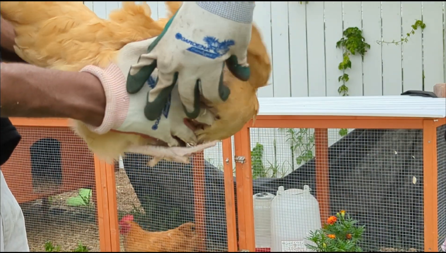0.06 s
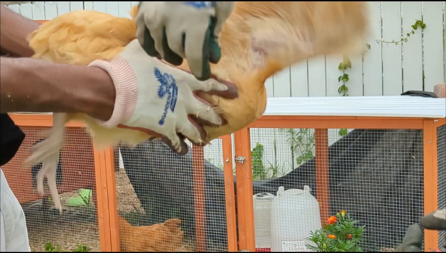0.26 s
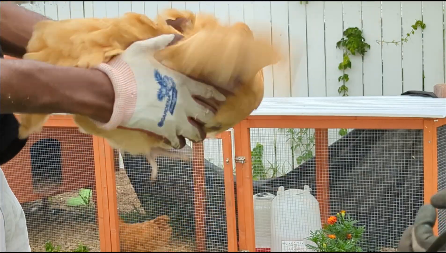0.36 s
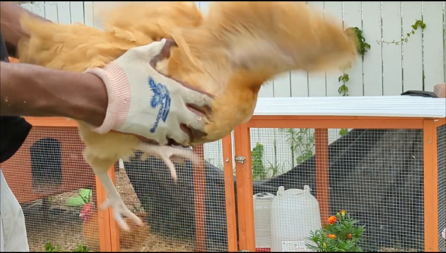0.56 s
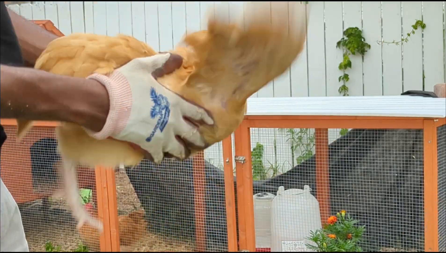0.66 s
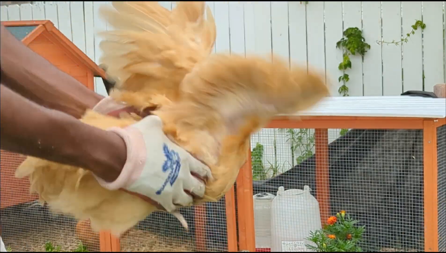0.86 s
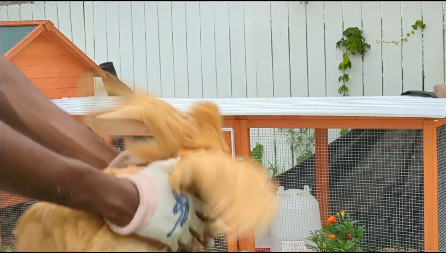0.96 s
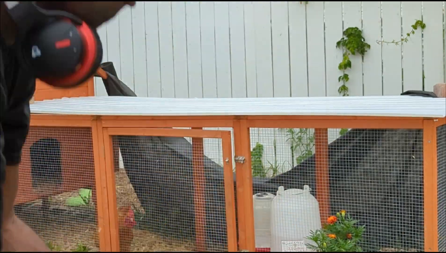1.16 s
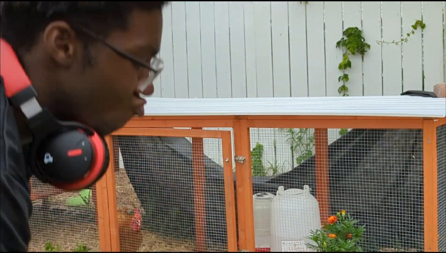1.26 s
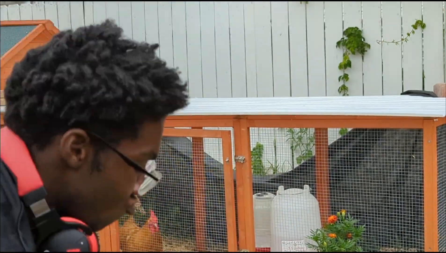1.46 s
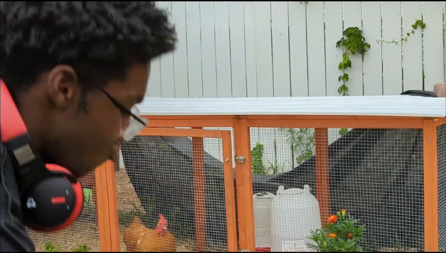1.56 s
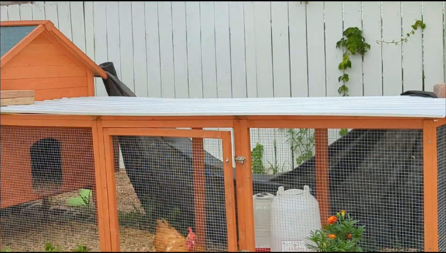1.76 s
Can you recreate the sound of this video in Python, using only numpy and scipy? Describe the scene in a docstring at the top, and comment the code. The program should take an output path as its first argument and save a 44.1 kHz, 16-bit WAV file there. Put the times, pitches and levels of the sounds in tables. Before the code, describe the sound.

Hen clucking in short hoarse bursts with flapping wings, ending in a clear squawk.

```python
"""Short, hoarse, cluck-like rasps, close to the microphone: a hen struggles in gloved hands in a backyard.
The rasps keep time with her wingbeats, which push puffs of air and snap the feathers;
then she lets out one long, clear squawk, crossed by a wing swish. Farther off, fence and coop
return a faint echo over a quiet hiss."""
import sys
import numpy as np
from scipy import signal
from scipy.fft import rfft, irfft
from scipy.io import wavfile
from scipy.ndimage import uniform_filter1d

SR = 44100
rng = np.random.default_rng(int(sys.argv[2]) if len(sys.argv) > 2 else 0)


def transcribe(u):
    """Save the signal u as a 16-bit wav file named by the first command-line argument.

    u: samples, shape (n,) or (channels, n), limited to [-1, 1]; the rate is SR.
    q: integer samples, one column per channel.
    """
    v = np.clip(np.atleast_2d(u).T, -1, 1)
    q = np.round(v * 32767).astype(np.int16)
    wavfile.write(sys.argv[1], SR, q)


N = 79380
T = np.arange(N) / SR


def amp(db):
    """Decibels to gain."""
    return 10 ** (np.asarray(db) / 20)


def unit(x):
    """Scales to rms 1."""
    return x / np.sqrt(np.mean(x ** 2) + 1e-20)


def steady(x, size=500):
    """Holds the short-time level at 1, keeping the fine grain."""
    return x / np.sqrt(abs(uniform_filter1d(x ** 2, size)) + 1e-12)


def bump(at, half):
    """A bell-shaped swell in time."""
    return np.exp(-((T - at) / half) ** 2 / 2)


def drift(hz):
    """Random wander of rms 1, up to the given rate."""
    return unit(irfft(rfft(rng.standard_normal(N)) / (1 + (np.fft.rfftfreq(N, 1 / SR) / hz) ** 4), N))


def level_at(spectrum, hz):
    """Reads a spectrum in dB on a log-frequency axis."""
    f, db = np.transpose(spectrum)
    return np.interp(np.log(hz + 1), np.log(f + 1), db)


def colour(x, spectrum):
    """Minimum-phase filter with the given spectrum and unit power gain."""
    size = 2048
    cepstrum = irfft(np.log(amp(level_at(spectrum, np.fft.rfftfreq(size, 1 / SR)))))
    cepstrum[1:size // 2] *= 2
    cepstrum[size // 2 + 1:] = 0
    taps = irfft(np.exp(rfft(cepstrum)))
    return signal.oaconvolve(x, taps / np.linalg.norm(taps))[:len(x)]


def lowpass(x, hz):
    """Removes the treble without shifting phase."""
    return signal.sosfiltfilt(signal.butter(2, hz, fs=SR, output="sos"), x)


def resonate(x, hz, width_hz):
    """A steep resonance that follows the curve hz."""
    turn = np.exp(2j * np.pi * np.cumsum(hz) / SR)
    r = np.exp(-np.pi * width_hz / SR)
    return 2 * (turn * signal.lfilter([(1 - r) ** 2], [1, -2 * r, r * r], x / turn)).real


# Background noise at the microphone (frequency [Hz], relative level [dB])
BACKGROUND_SPECTRUM = [(20, -20), (80, 3), (160, -4), (300, -7), (480, -3), (800, -9), (1900, -16),
                       (4500, -26), (7500, -25), (16000, -27)]
# Its course in two bands (time [s], body gain [dB], treble gain [dB])
BACKGROUND_GAINS = [(0, -50, -53), (.3, -50, -51.5), (.8, -51.5, -53), (1.15, -48, -49),
                    (1.602, -50, -43.5), (1.702, -51.5, -50), (1.8, -51, -37)]


def background():
    """Quiet rumble and hiss; the hiss swells as the recorder's gain recovers after the squawk."""
    times, body_db, treble_db = np.transpose(BACKGROUND_GAINS)
    noise = colour(rng.standard_normal(N), BACKGROUND_SPECTRUM)
    body = lowpass(noise, hz=2810)
    body_gain = amp(np.interp(T, times, body_db) + 1.33 * drift(86))
    treble_gain = amp(np.interp(T, times, treble_db) + 3.1 * drift(29))
    return body * body_gain + (noise - body) * treble_gain


def yard_echo(x):
    """Early reflections from the nearby coop, then a faint dull tail from the fences farther off."""
    coop_s, coop_db, fence_db, t60_s, top_hz = 0.0072, -9.5, -21.5, 0.38, 4200
    t = T[:SR // 2]
    taps = rng.standard_normal(len(t)) * (rng.random(len(t)) < 2000 / SR)  # about 2000 echoes a second
    coop = taps * (t < coop_s) * (t > coop_s / 10)
    fence = signal.lfilter(*signal.butter(1, top_hz, fs=SR), taps) * amp(-60 * t / t60_s) * (t > coop_s)
    response = amp(fence_db) * fence / np.linalg.norm(fence) + amp(coop_db) * coop / np.linalg.norm(coop)
    return signal.fftconvolve(x, response)[:N]


# Wing strokes close to the microphone (time [s], half length [s], level [dB])
WING_PUFFS = [(0.502, 0.019, -38), (0.582, 0.014, -39.5), (0.735, 0.015, -36), (0.885, 0.03, -38),
              (0.952, .02, -47), (1.105, 0.017, -36.5), (1.189, 0.014, -38), (1.255, 0.024, -39),
              (1.361, 0.032, -42), (1.463, 0.023, -38.5), (1.518, 0.0076, -35.5)]
# The air they push (frequency [Hz], relative level [dB])
PUFF_SPECTRUM = [(28, -42), (55, -3), (90, 2), (170, 1), (300, -7), (3000, -39.5)]


def wings():
    """Each stroke pushes a soft low puff of air."""
    swell = sum(amp(db) * bump(at, half) for at, half, db in WING_PUFFS)
    return swell * steady(colour(rng.standard_normal(N), PUFF_SPECTRUM), size=1000)


# Snaps and brushes at close range (time [s], rise [s], decay [s], level [dB], tilt [dB/octave])
FEATHER_SNAPS = [(0.2642, 0.00049, .002, -25.5, -1), (0.386, 0.0098, 0.02, -37.5, -1.5),
                 (0.53, 0.0026, 0.0036, -39, 5), (0.63, 0.002, 0.0014, -37, -3),
                 (0.677, 0.0035, 0.0042, -34.5, -1), (0.69, 0.0022, 0.0038, -39, -1),
                 (0.864, 0.0015, 0.0062, -40.5, 3), (0.980, 0.0047, 0.0092, -33.5, 0),
                 (1.202, 0.007, 0.0069, -36.5, -1), (1.338, 0.003, 0.0045, -30.5, 0),
                 (1.479, 0.0084, 0.0073, -38, 0.5), (1.612, 0.003, 0.0022, -43, 1.5)]
# Feather on glove (frequency [Hz], relative level [dB])
FEATHER_SPECTRUM = [(150, -4.5), (650, 10.5), (1500, 4), (5000, -5.5), (7500, -1), (11000, -2),
                    (16000, -10)]


def feathers():
    """Quills snap and brush against the gloves in grainy bursts, over a rustle while the hen is held."""
    rustle_db, fade_s, release_s = -57.5, 0.15, 1.345
    tail_db, tail_s = -13.5, 0.015
    grain = unit(rng.standard_normal(N) * amp(5 * drift(1570)))
    held = np.clip(T / fade_s, 0, 1) * np.clip((release_s - T) / fade_s, 0, 1)
    out = colour(grain * held * amp(rustle_db + 4.5 * drift(33)), FEATHER_SPECTRUM)
    for at, rise, decay, db, tilt in FEATHER_SNAPS:
        t = np.maximum(T - at - rise, 0)
        attack = np.clip((T - at) / rise, 0, 1) ** 2
        fade = np.exp(-t / decay) + amp(tail_db) * np.exp(-t / tail_s)
        tilted = [(f, level + tilt * np.log2(f)) for f, level in FEATHER_SPECTRUM]
        out += colour(grain * amp(db) * attack * fade, tilted)
    return out


# Hoarse, cluck-like rasps with the wingbeats, close up; the last is a wing swish during the squawk
# (time of full swell [s], rise [s], hold [s], fall [s], level [dB], resonance [Hz],
# resonance level [dB], treble gain [dB], roughness [noise share, capped at 1])
WINGBEAT_RASPS = [(0.165, 0.024, 0.0094, 0.01, -33, 1410, 0.5, -9, 0.61),
                  (0.237, 0.01, 0.0075, 0.028, -28, 1300, -7.5, -3, 0.53),
                  (.370, 0.032, 0.026, 0.019, -25.5, 1640, -3, 1, 0.43),
                  (0.44, 0.017, 0.0022, 0.022, -36, 556, 7, 0, 0.56),
                  (0.523, 0.033, 0.03, 0.027, -22.5, 1564, 0, 0.5, 0.44),
                  (0.698, 0.035, 0.011, 0.02, -31.5, 930, -17, 0, 0.7),
                  (0.913, 0.023, 0.0094, 0.028, -24.5, 1400, 2.5, -6, 0.69),
                  (1.087, 0.022, 0.014, 0.012, -27.5, 1370, -10, -7.5, 0.69),
                  (1.186, 0.0086, 0.055, 0.011, -37, 930, -3, 6.5, 1.07),
                  (1.221, 0.0053, 0.014, 0.0086, -20.5, 1610, 5.5, 2.5, 0.83),
                  (1.25, 0.0071, 0.014, 0.029, -22.5, 1630, 2.5, -11, 0.69),
                  (1.442, 0.025, 0.013, 0.0038, -21, 1070, 9.5, -19, 1.1)]
# Colour of the rasps and the swish (frequency [Hz], relative level [dB])
RASP_SPECTRUM = [(150, -27), (320, -8.5), (460, 1), (680, 1.5), (1000, 3.5), (1550, -1), (2100, -4),
                 (2450, -18), (3050, -9), (3550, -19.5), (4050, -15), (4600, -33.5), (16000, -36)]


def rasps():
    """Uneven pulses of sagging pitch and noise ring a resonance that rises as each sound swells."""
    pitch_hz, sag_hz_per_s, resonance_drop = 507.6, 700, 0.23
    onset_s, rise_db, fall_db = 0.0018, 15.5, 17.5
    jitter = 0.075 * drift(250)
    strength = amp(3 * drift(200))
    out = np.zeros(N)
    for at, rise, hold, fall, db, resonance_hz, resonance_db, treble_db, rough in WINGBEAT_RASPS:
        rough = min(rough, 1)
        on = abs(T - at) < 0.15
        t = T[on] - at
        cycles = np.cumsum((pitch_hz - sag_hz_per_s * t) * (1 + jitter[on])) / SR
        pulses = np.diff(np.floor(cycles), prepend=0) * strength[on]
        noise = unit(rng.standard_normal(N)[on] * (0.37 + np.exp(-(cycles % 1) / 0.53)))
        drive = (1 - rough) * unit(pulses - pulses.mean()) + rough * noise
        spectrum = [(f, level + treble_db * (2350 < f < 4700)) for f, level in RASP_SPECTRUM]
        body = unit(colour(drive, spectrum))
        onset = np.clip((t + rise) / onset_s + 1, 0, 1)
        swell = amp(-rise_db * np.maximum(-t / rise, 0) - fall_db * np.maximum((t - hold) / fall, 0))
        glide = 1 - resonance_drop * (1 - swell) * (t < 0)
        ring = unit(resonate(body, resonance_hz * glide, width_hz=500))
        rasp = steady(body + amp(resonance_db) * ring)
        dull = lowpass(rasp, resonance_hz)
        treble = (rasp - dull) * swell ** 0.33  # duller when weak
        out[on] += amp(db) * onset * swell * (dull + treble)
    return out


# The long cry, close up (time [s], pitch [Hz], level [dB], roughness [0-1], beak resonance gain [dB])
SQUAWK_COURSE = [(1.239, 455, -30.5, 0.43, -13), (1.257, 470, -25, 0.43, -34), (1.277, 513, -28, 0.2, 0),
                 (1.319, 517.7, -27, 0, 5), (1.324, 512.7, -29, 0.36, -1), (1.345, 528.5, -27, 0.07, -22),
                 (1.374, 538.8, -21, 0.03, 9.5), (1.442, 522.7, -25, 0.01, 1),
                 (1.479, 531.3, -23.5, 0.13, 5), (1.497, 505.8, -27, 0.25, -6),
                 (1.512, 469, -30, 0.38, -3.5), (1.532, 448, -74, 0.35, -11)]
# Her throat (frequency [Hz], gain with beak half open [dB], gain with beak wide open [dB])
THROAT_SPECTRA = [(516, -21, -7.5), (1070, 5, -2.5), (1510, -1, 3), (2100, 2.5, -1.5), (2550, -8.5, -23.5),
                  (3480, -6, -6), (4030, 0, -9.5), (4650, -9.5, -12.5), (5450, -8.5, -27),
                  (5950, -2.5, -7.5), (5900, -8, -19), (6960, -10, -16), (7330, -6, -15), (7830, -37, -24),
                  (8750, -15, -23.5), (10090, -18.5, -14.5), (10800, -32, -26), (11700, -27, -24),
                  (12700, -28, -30)]
# Resonances that flare at the height of the cry (time [s], half length [s], frequency [Hz], level [dB])
SQUAWK_FLARES = [(1.38, 0.015, 3200, 0.5), (1.368, 0.023, 4820, -5.5)]


def squawk():
    """A clear harmonic cry through throat and beak, rough and duller at both ends; a whistle joins late."""
    opens_at_s, opening_s, full_voice_hz = 1.353, 0.04, 505.5
    beak_hz, width_hz, whistle_hz = 3083, 140, 8030
    times, *columns = np.transpose(SQUAWK_COURSE)
    pitch, db, rough, beak_db = (np.interp(T, times, column) for column in columns)
    phase = 2 * np.pi * np.cumsum(pitch * (1 + 0.04 * rough * drift(287))) / SR
    on = (T > times[0]) & (T < times[-1])
    half_open = [(f, level) for f, level, _ in THROAT_SPECTRA]
    wide_open = [(f, level) for f, _, level in THROAT_SPECTRA]
    opening = (1 + np.tanh((T[on] - opens_at_s) / opening_s)) / 2
    dull_db = 0.44 * np.minimum(pitch[on] - full_voice_hz, 0)  # upper overtones fade at low pitch
    peaks = [(beak_hz, amp(3 + beak_db[on]))]
    peaks += [(hz, amp(level) * bump(at, half)[on]) for at, half, hz, level in SQUAWK_FLARES]
    voice = np.zeros(N)
    for k in range(1, 30):
        hz = k * pitch[on]
        throat = amp((1 - opening) * level_at(half_open, hz) + opening * level_at(wide_open, hz))
        beak = sum(height / (1 + ((hz - centre) / width_hz) ** 2) for centre, height in peaks)
        treble_db = dull_db * np.clip(2 * np.log2(hz / beak_hz), 0, 1)
        waver_db = 3 * np.minimum(hz / 4500, 1) ** 2 * drift(19)[on]
        rasp_db = 3 * np.minimum(hz / 8000, 1) ** 2 * opening * drift(200)[on]
        gain = np.hypot(throat, beak) * amp(treble_db + waver_db + rasp_db)
        voice[on] += gain * np.cos(k * phase[on] + rng.uniform(0, 2 * np.pi))
    breath = colour(rng.standard_normal(N) * (1 + 0.51 * np.cos(phase)), wide_open)
    whistle = unit(resonate(rng.standard_normal(N), np.full(N, whistle_hz), width_hz=400))
    whistle *= bump(at=1.435, half=0.044)
    return on * amp(db) * (steady(voice) + amp(-1.5) * rough * breath + amp(-21) * whistle)


def scene():
    """One microphone beside the hen, with the yard behind her."""
    struggle = rasps() + feathers()
    cry = squawk()
    echo = yard_echo(cry + amp(-15) * struggle)  # rasps and snaps carry less far than the squawk
    return (struggle + cry + echo + wings() + background())[None]


def record(dry):
    """The recorder's band limit."""
    taps = signal.firwin(511, cutoff=16050, window=("kaiser", 9), fs=SR)
    return signal.oaconvolve(dry, taps[None], "same")


dry = scene()
out = record(dry)
transcribe(out)
```